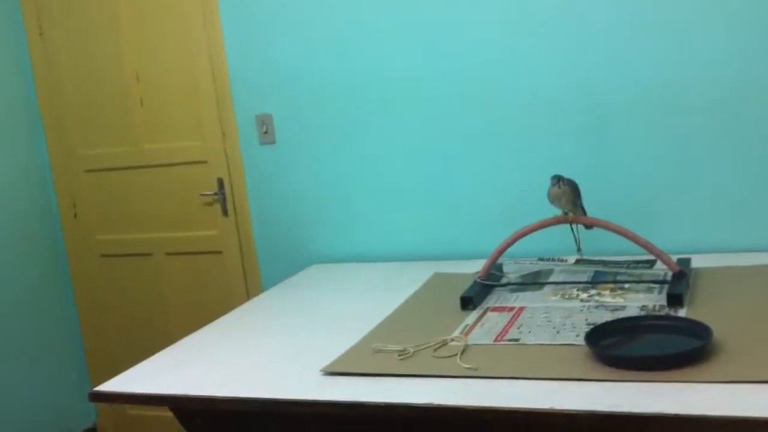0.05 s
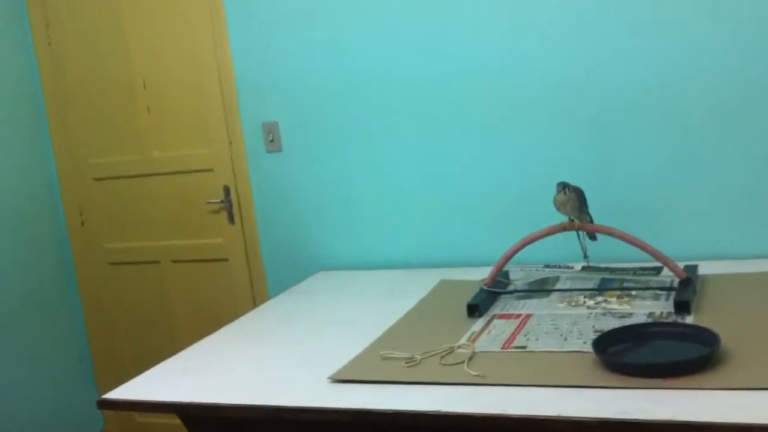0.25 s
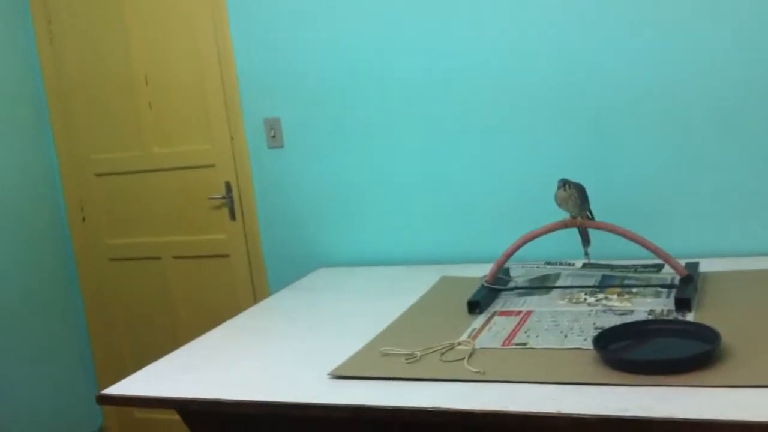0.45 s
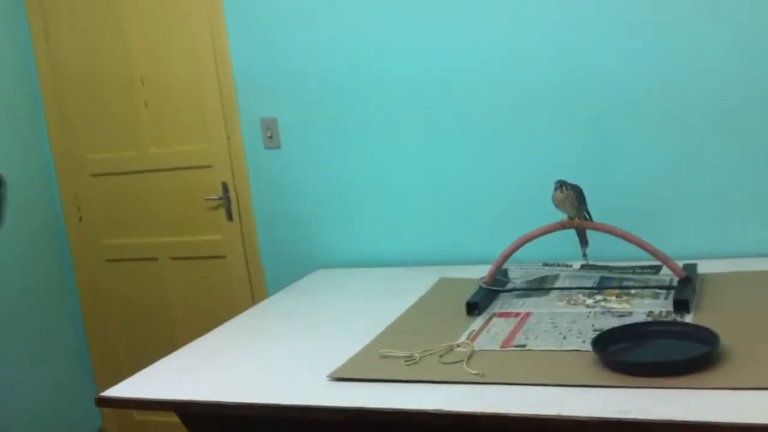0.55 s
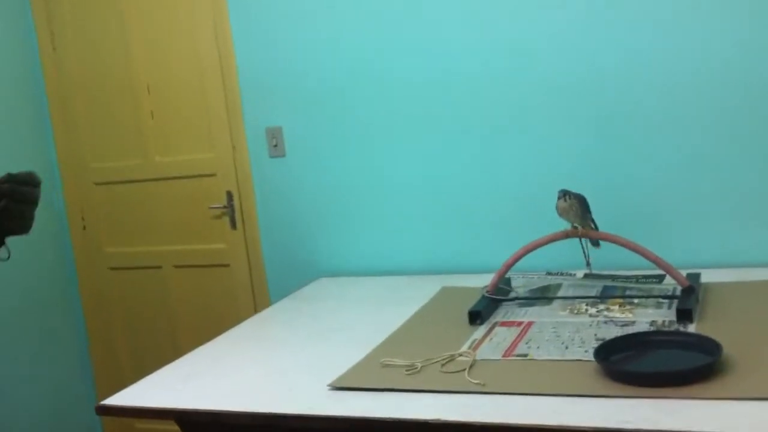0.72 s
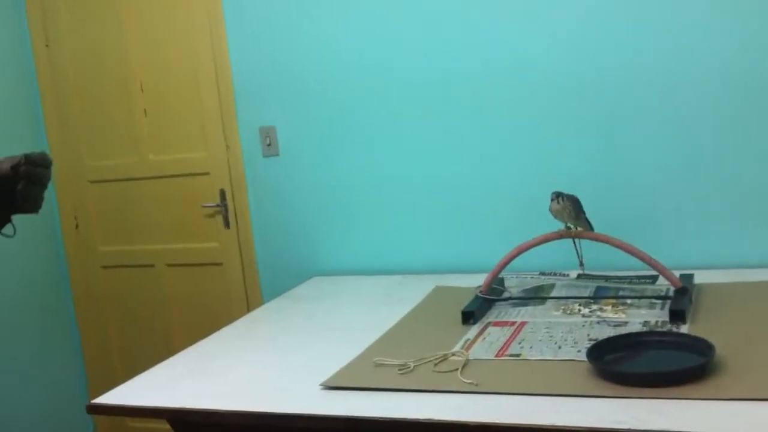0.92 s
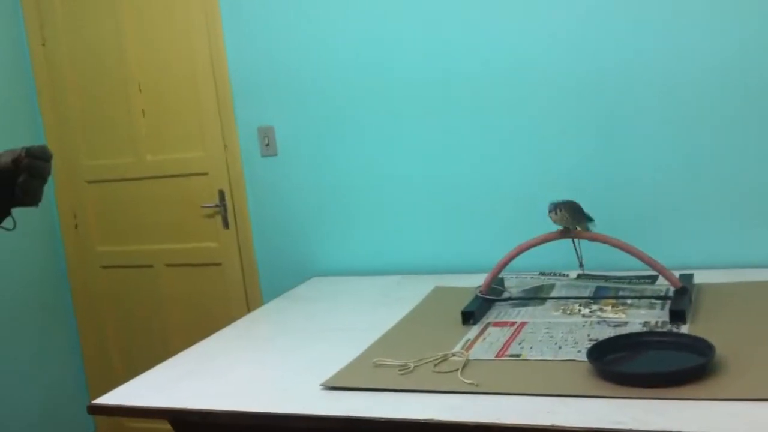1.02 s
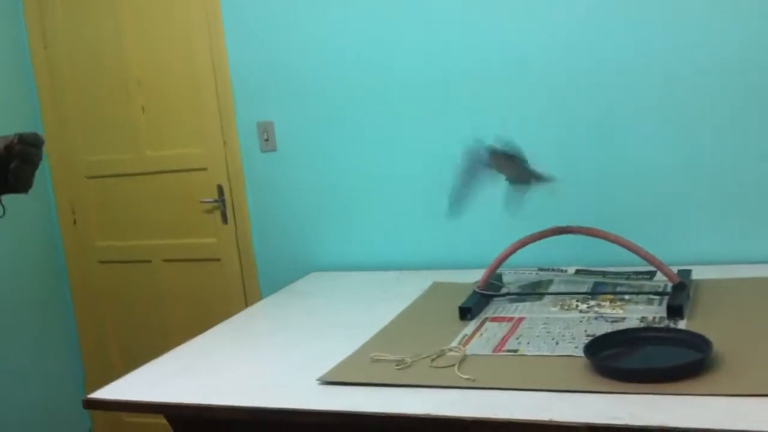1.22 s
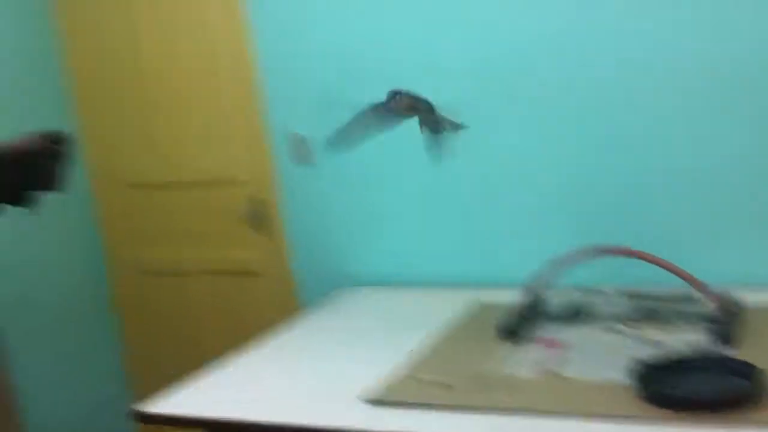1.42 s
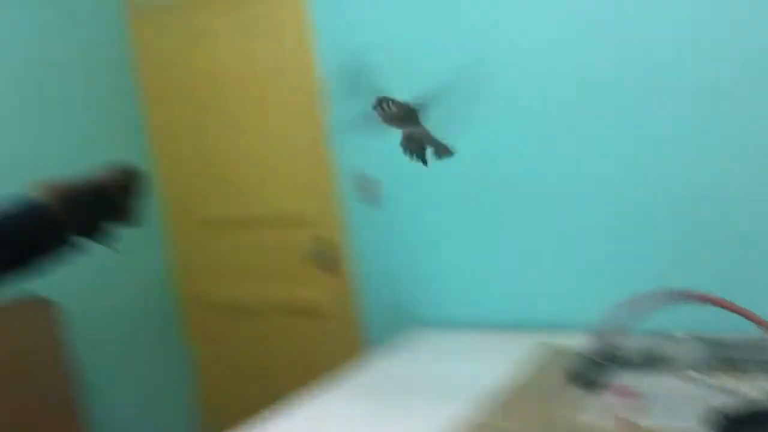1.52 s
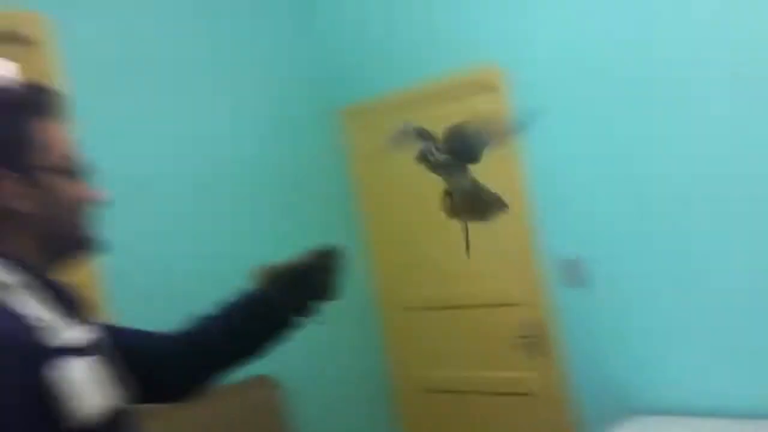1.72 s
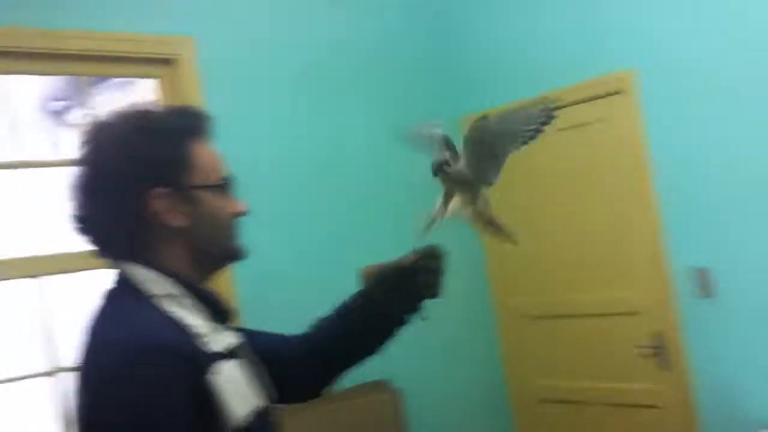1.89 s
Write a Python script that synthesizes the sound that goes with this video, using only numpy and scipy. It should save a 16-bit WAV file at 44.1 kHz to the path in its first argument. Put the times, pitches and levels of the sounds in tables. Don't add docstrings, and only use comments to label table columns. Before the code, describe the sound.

Young bird of prey yelps once up close, then whines shakily, with soft wingbeats as it flies

```python
import sys
import numpy as np
from scipy import signal
from scipy.fft import rfft, irfft, next_fast_len
from scipy.io import wavfile
from scipy.ndimage import uniform_filter1d, map_coordinates

SR = 44100
rng = np.random.default_rng(int(sys.argv[2]) if len(sys.argv) > 2 else 0)


def volts_from_decibels(level):
    exponent = np.asarray(level, float) / 20
    return 10 ** exponent


def dump(signal):
    limited = np.clip(np.atleast_2d(signal).T, -1, 1)
    pcm = np.round(limited * 32767).astype(np.int16)
    wavfile.write(sys.argv[1], SR, pcm)


N = 85995


def unit(x):
    return x / np.sqrt(np.mean(x ** 2) + 1e-20)


def along(points, hz):
    f, v = np.transpose(points)
    return np.interp(np.log(hz + 1), np.log(f + 1), v)


def clock():
    return np.arange(N) / SR


def wobble(rate_hz):
    knots = rng.standard_normal(2400)
    return map_coordinates(knots, [np.arange(N) * rate_hz / SR])


def filtered(x, response):
    m = next_fast_len(N + 8192)
    return irfft(rfft(x, m) * response(np.fft.rfftfreq(m, 1 / SR)), m)[:N]


def noise(spectrum):
    return unit(filtered(rng.standard_normal(N), lambda hz: volts_from_decibels(along(spectrum, hz))))


def room(x):
    # frequency_hz, t60_s
    decay = [(300, 0.48), (2000, 0.65), (4500, 0.84), (9000, 0.57), (15000, 0.51)]
    wall_s = 0.006
    hz, t, z = signal.stft(rng.standard_normal(SR), SR, nperseg=256)
    fade = volts_from_decibels(-60 * t / along(decay, hz)[:, None])
    tail = signal.istft(z * fade, SR, nperseg=256)[1]
    delayed = np.pad(x, (round(wall_s * SR), 0))
    return signal.fftconvolve(delayed, tail / np.linalg.norm(tail))[:N]


def whine(rows, bright_db, rasp, split_s, split_db):
    overtones = [-8, 0.5, 0, -9, -7.5, -11, -15]
    half_lines = [-42, -34.5, -15.5, -26, -36, -19]
    attack_s, droop_s, split_rise_s, rasp_s = 0.005, 0.03, 0.01744, 0.015
    droop_share, end_rasp = 0.085, 0.025
    start_s, pitch_hz, effort_db = np.transpose(rows)
    t = clock()
    after = np.clip((t - start_s[-1]) / droop_s, 0, 1)

    onset_rasp = rasp * np.exp(-np.abs(t - start_s[0]) / rasp_s)
    ragged = (onset_rasp + end_rasp * after) * wobble(500)
    waver = 0.006 * wobble(28)
    jitter = 0.0045 * wobble(260)
    hz = np.interp(t, start_s, pitch_hz) * (1 - droop_share * after + ragged + waver + jitter)
    turn = 2 * np.pi * np.cumsum(hz) / SR

    voice = 0
    for k, db in enumerate(overtones, start=1):
        shimmer_db = 2.5 * wobble(70)
        voice = voice + volts_from_decibels(db + bright_db * (k - 2.5) + shimmer_db) * np.sin(k * turn)
    halves = 0
    for k, db in enumerate(half_lines):
        flicker = 0.38 + wobble(120)
        halves = halves + volts_from_decibels(db + split_db) * flicker * np.sin((k + 0.5) * turn)
    split = np.clip((t - split_s) / split_rise_s, 0, 1)
    breath = volts_from_decibels(-44) * noise([(1500, -23), (3000, -5), (16000, -10)])

    attack = np.clip((t - start_s[0]) / attack_s, 0, 1)
    effort = volts_from_decibels(np.interp(t, start_s, effort_db) - 36 * after)
    return effort * attack * (after < 1) * (voice + split * halves + breath)


def whines():
    # start_s, pitch_hz, effort_db
    contours = [
        [(0, 2076, -33), (.025, 2213, -37.5), (.07, 2159, -39), (.115, 2246, -34.5)],
        [(.42, 2145, -39.5), (.5, 2079, -45), (.53, 2090, -32.5), (.59, 2092, -46.5), (.65, 2149, -33),
         (.68, 2193, -50), (.695, 2240, -36), (.735, 2249, -35.5)],
        [(.92, 2134, -35), (.945, 2252, -34), (1.0, 2315, -37), (1.05, 2273, -33), (1.07, 2195, -33),
         (1.09, 2198, -33), (1.11, 2151, -33.5)],
        [(1.395, 2154, -34.5), (1.415, 2138, -25), (1.45, 2203, -28), (1.52, 2182, -28), (1.56, 2176, -25.5),
         (1.585, 2144, -28.5), (1.605, 2129, -29)],
        [(1.782, 2191, -31.5), (1.815, 2235, -26.5), (1.88, 2259, -27.5), (1.95, 2284, -26.5)],
    ]
    bright = [-0.64, -1, -1, 1, 1]
    onset_rasps = [0.024, 0.011, 0.031, 0.037, 0.067]
    split_starts = [0.17, 0, 1.2, 1.42, 1.865]
    split_depths = [-42.5, -38, -34, -13.5, 2]
    calls = 0
    for settings in zip(contours, bright, onset_rasps, split_starts, split_depths):
        call = whine(*settings)
        calls = calls + volts_from_decibels(-4) * call + volts_from_decibels(-2) * room(call)
    return calls


def yelp():
    # start_s, pitch_hz, effort_db, pinch_db (lifts the 4th overtone)
    contour = [
        (0.083, 1082, -45.5, -48.5),
        (.089, 1178, -13, -41.5),
        (0.091, 1383, -18, -53),
        (.101, 1874, -12.5, -36),
        (.116, 2093, -7.5, -47),
        (0.147, 2132, -8, -21.5),
        (.158, 1981, -6, -23.5),
        (0.175, 2003, -19.5, -48),
        (0.196, 1433, -37, -55.5),
    ]
    # frequency_hz, level_db
    rush = [(900, -23.5), (1500, -7), (2500, -11.5), (4200, -1), (5500, -11.5), (7400, -10.5), (11000, -1),
            (15500, -13.5)]
    pipe_hz, pipe_width_hz = 2135, 410
    s, *curves = np.transpose(contour)
    t = clock()
    pitch, effort_db, pinch_db = [np.interp(t, s, curve) for curve in curves]
    on = uniform_filter1d(((t > s[0]) & (t < s[-1])) * 1., size=150)
    turn = 2 * np.pi * np.cumsum(pitch) / SR
    release_s = np.maximum(t - s[6], 0)

    def pipe(f):
        return 1 / (1 + ((f - pipe_hz) / pipe_width_hz) ** 2)

    rise = np.clip((t - s[1]) / (s[2] - s[1]), 0, 1)
    first = pipe(pitch) ** 1.5 * rise * np.sin(turn)
    second = volts_from_decibels(1.5 - 400 * release_s) * (0.03 + pipe(2 * pitch)) * np.sin(2 * turn)
    third = volts_from_decibels(-34) * np.sin(3 * turn)
    fourth = volts_from_decibels(pinch_db) * np.sin(4 * turn)
    fifth = volts_from_decibels(pinch_db - 14.5) * np.sin(5 * turn)
    tone = np.sqrt(2) * on * volts_from_decibels(effort_db) * (first + second + third + fourth + fifth)

    air_db = -32.5 + 0.46 * effort_db - 140 * release_s
    air = np.sqrt(2) * on * volts_from_decibels(air_db) * noise(rush) * (t > s[2])
    return tone + air + room(volts_from_decibels(-8.5) * tone + volts_from_decibels(-9.5) * air)


def wings():
    # start_s, level_db
    wing_beats = [(0.028, -62.5), (.23, -56), (.31, -58.5), (0.748, -63), (1.271, -69), (1.33, -64),
                  (1.38, -69.5), (1.428, -63.5), (1.501, -65.5), (1.578, -60), (1.662, -61), (1.78, -67)]
    # frequency_hz, level_db
    feathers = [(120, -12), (200, -7.5), (400, -7), (800, -15.5), (2000, -21.5), (5000, -13),
                (15000, -44.5)]
    # frequency_hz, level_db
    swish = [(1000, -20), (3000, -7), (8000, -9), (15000, -1)]
    beat_s, leap_s, leap_end_s = 0.042, 1.24, 1.383
    t = clock()
    puffs = sum(volts_from_decibels(db) * np.exp(-((t - s) / beat_s) ** 2) for s, db in wing_beats)
    beats = puffs * volts_from_decibels(3.6 * wobble(44.48)) * noise(feathers)
    leap = np.sqrt(np.clip((t - leap_s) / (leap_end_s - leap_s), 0, 1)) * (t < leap_end_s)
    return beats + volts_from_decibels(1) * room(beats) + volts_from_decibels(-58.5) * leap * noise(swish)


def air_hum():
    # frequency_hz, level_db
    hum = [(24, -50), (40, -22), (70, -12), (173, 3), (837, -8.5), (1100, -10), (1290, -14.5), (1600, -14),
           (2080, -39.5), (3520, -120)]
    swell_db = 0.89 * wobble(2.2)
    hiss = noise([(500, -28), (1500, 9.5), (16000, -15.5)])
    return volts_from_decibels(-70 + swell_db) * noise(hum) + volts_from_decibels(-75) * hiss


def masked(x):
    # frequency_hz, depth_db
    depth = [(800, 46), (1500, 36), (3000, 31), (5000, 27), (15000, 26)]
    reach_hz, soft_db = 2600, 1.2
    hz, _, z = signal.stft(x, SR, nperseg=1024)
    power = uniform_filter1d(np.abs(z) ** 2, size=3, axis=1) + 1e-20
    groups = power[:-1].reshape(-1, 8, power.shape[1])
    bands = np.repeat(groups.mean(axis=1), 8, axis=0)
    around = np.abs(uniform_filter1d(power, size=round(reach_hz * 1024 / SR), axis=0))[:-1] + 1e-20
    below_db = 10 * np.log10(np.abs(bands) / around + 1e-9)
    margin_db = np.clip(below_db + along(depth, hz[:-1, None]), -40, 40)
    keep = np.pad(1 / (1 + np.exp(-margin_db / soft_db)), ((0, 1), (0, 0)))
    return signal.istft(z * keep, nperseg=1024)[1][:N]


def scene():
    return (yelp() + whines() + wings() + air_hum())[None]


def low_pass(x):
    return signal.sosfilt(signal.butter(12, 15980, fs=SR, output="sos"), x)


def record(dry):
    low_hz, top_hz = 114, 15800
    heard = filtered(dry[0], lambda hz: (hz < top_hz) / (1 + (low_hz / (hz + 1)) ** 4))
    return low_pass(masked(heard)[None])


dry = scene()
out = record(dry)
dump(out)
```